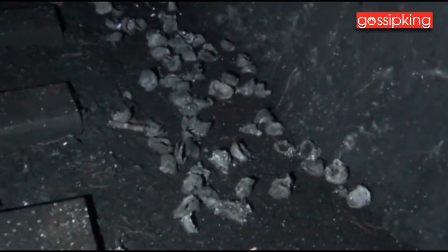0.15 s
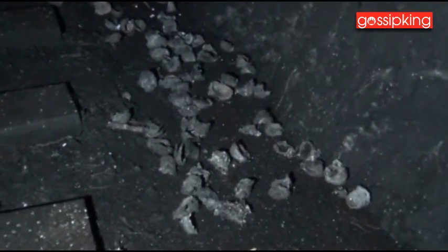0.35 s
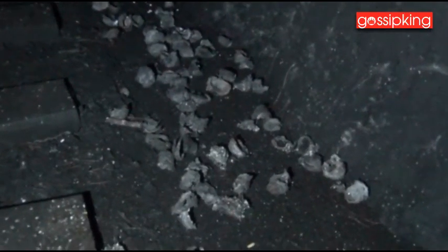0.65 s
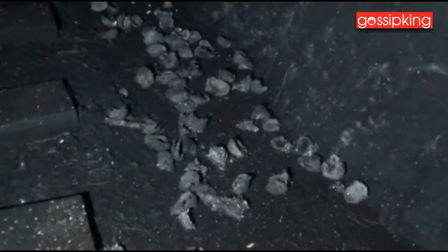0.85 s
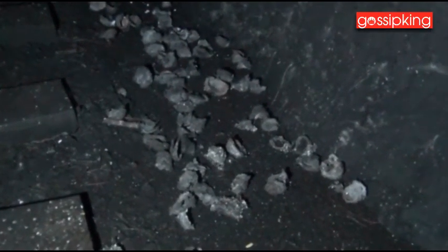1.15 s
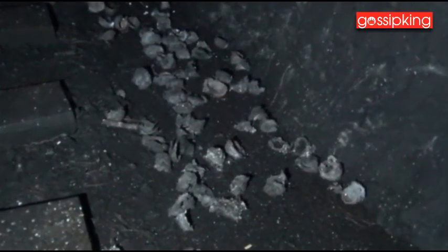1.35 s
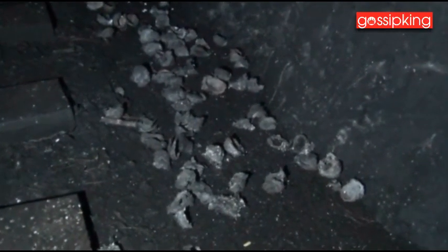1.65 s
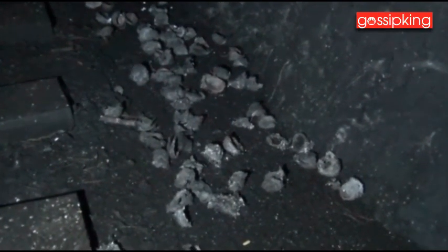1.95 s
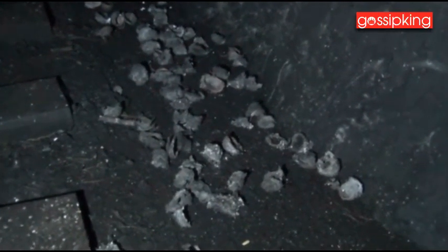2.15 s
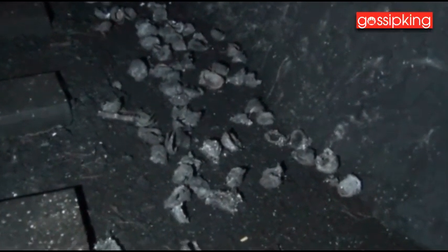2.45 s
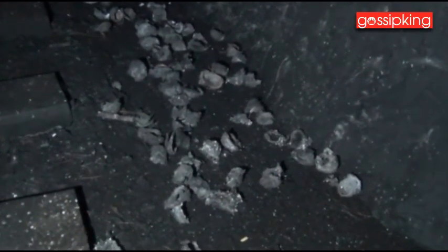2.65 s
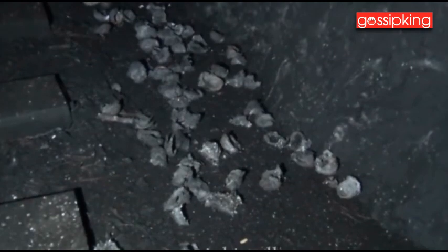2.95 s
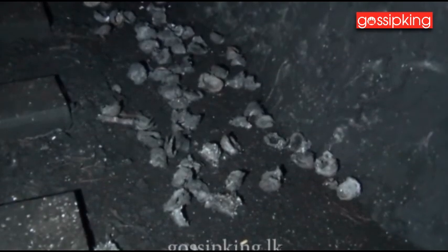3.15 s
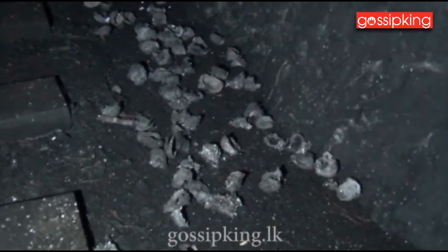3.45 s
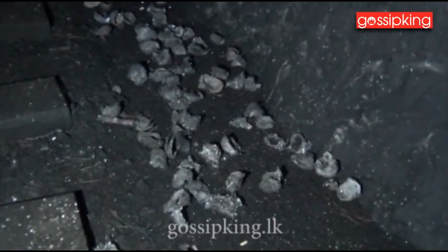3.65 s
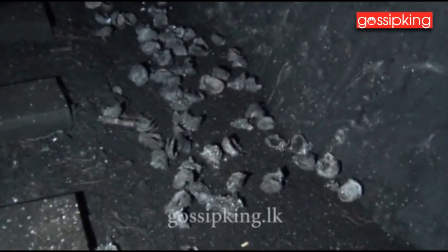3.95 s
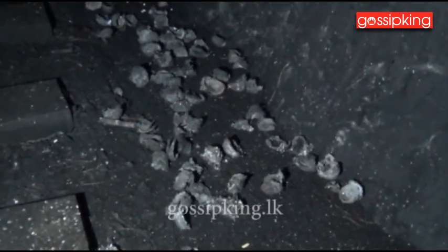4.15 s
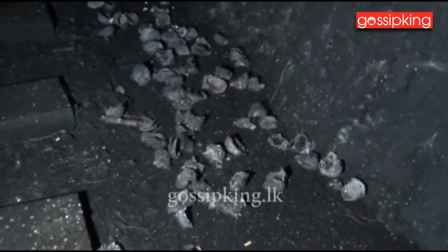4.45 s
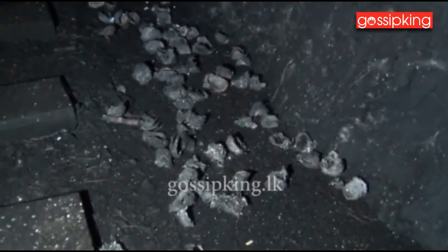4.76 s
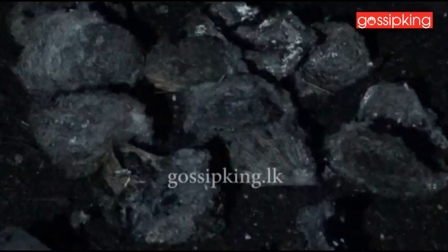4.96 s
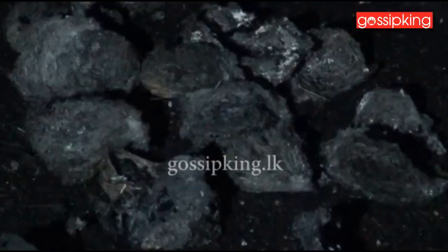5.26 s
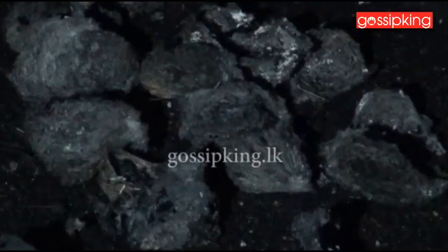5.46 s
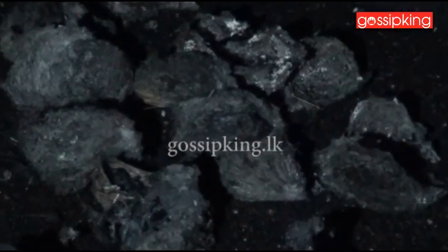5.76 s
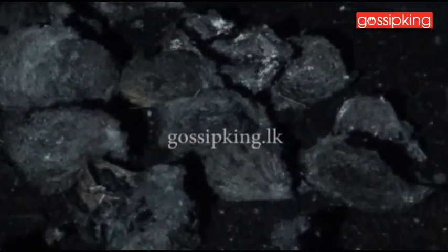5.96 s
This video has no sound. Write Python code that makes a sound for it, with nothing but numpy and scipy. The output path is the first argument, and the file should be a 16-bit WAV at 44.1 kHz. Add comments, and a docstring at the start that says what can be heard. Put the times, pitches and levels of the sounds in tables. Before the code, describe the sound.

A steady, high-pitched drone of many insects fills the night outdoors, over a faint low rush of air. Close by, dry litter crackles and rustles in small snaps, mostly during the first three seconds, with a few faint scrapes and soft bumps. Shells click and knock with a very short ring: lightly at about 0.7 seconds, sharply at 1.2, and in a cluster around 2.5. From about 2.2 seconds, one nearer insect rasps in rough, rising chirps, five a second, growing a little louder. Light clicks come around 4 seconds and a sharper knock at 4.7. Just before 5 seconds the level dips for an instant and the near rasp is gone. The drone continues, with thin, very high chirrs repeating until about 5.9. The loudest shell knock lands at 5.5 seconds, followed by a smaller one, and the level dips briefly again at 6.

```python
"""Outdoors at night, over a litter of shells on damp ground. Countless insect wing strokes merge into a
high drone above the low night air. One nearer insect draws a scraper along a file in rising chirps,
five a second. Close by, dry litter crackles and rustles, surfaces scrape, and struck shells ring.
The level dips briefly twice; after the first dip the near rasp is gone and thin, higher chirrs repeat."""
import sys
import numpy as np
from scipy import signal
from scipy.fft import rfft, irfft
from scipy.io import wavfile
from scipy.ndimage import uniform_filter1d

SR = 44100
rng = np.random.default_rng(int(sys.argv[2]) if len(sys.argv) > 2 else 0)


def store_pcm(level_fs):
    """Save levels as 16-bit WAV."""
    pcm = np.round(np.clip(level_fs, -1, 1) * 32767).astype(np.int16)
    wavfile.write(sys.argv[1], SR, np.atleast_2d(pcm).T)


N = 268789
TIME = np.arange(N) / SR
FREQS = np.maximum(np.fft.rfftfreq(N, 1 / SR), 1)

# Chorus spectra before and after the first dip. Each row: frequency in Hz, relative density in dB.
EARLY_SPECTRUM = [(900, -46), (1600, -7.5), (2000, -7.5), (2600, -2.5), (3700, 1.5), (5500, 2), (6700, 1.5),
                  (7600, -7.5), (9100, -12), (10000, -17), (11200, -23.5), (13000, -98)]
LATE_SPECTRUM = [(880, -49), (1500, -8), (1790, -2.5), (1950, -40), (2070, -10), (2380, -4.5), (2720, -0.5),
                 (3730, 3), (4820, 1), (6020, 5), (7970, -7.5), (10200, -11.5), (11500, -24), (15000, -50),
                 (22000, -120)]
# Base stereo width before and after that dip. Each row: frequency in Hz, side minus mid in dB.
EARLY_SIDE = [(1500, -24), (3000, -16.5), (4500, -19.5), (6000, -13), (8000, -11), (11000, -13)]
LATE_SIDE = [(1500, -12), (4500, -7.5), (8000, -4.5)]
# The chorus widens, then narrows somewhat. Each row: time in seconds, change of side level in dB.
WIDTH_CHANGE = [(0, -15), (1.5, 4.5), (3, 8.5), (4.9, -3.5)]
# Surges of the chorus. Each row: start in seconds, length in seconds, rise in dB.
CHORUS_SURGES = [(0.395, 0.13, 1), (0.956, 0.1, 2.5), (1.178, 0.097, 5), (1.397, 0.03, 4), (1.53, 0.12, 2),
                 (1.738, 0.056, 3.5), (1.88, 0.47, 1.2), (2.463, 0.02, 12), (2.508, 0.047, 6),
                 (2.738, 0.2, 2.5), (3.453, 0.041, 5.5), (3.765, 0.46, 1), (4.357, 0.53, 2.5),
                 (5.718, 0.032, 7)]
# Lulls of the chorus. Each row: start in seconds, length in seconds.
CHORUS_LULLS = [(0.353, 0.019), (1.086, 0.15), (1.688, 0.072), (1.81, 0.049), (5.05, 0.064)]
# Resonances of single wing strokes. Each entry: frequency in Hz.
WING_RESONANCES = [3320, 4200, 5250, 6200]
# Spectrum of the distant air. Each row: frequency in Hz, relative density in dB.
AIR_SPECTRUM = [(15, -39), (25, -5.5), (48, 4), (75, -1), (110, 4), (200, -0.5), (300, 1), (400, -3),
                (480, -4), (620, -5), (740, -2), (870, 1.5), (1080, -8.5), (1260, -1), (1550, -16.5),
                (2000, -8), (2600, -33), (4400, -90)]
# Snaps of dry litter. Each row: start in seconds, level in dB, centre in Hz, relative rustle in dB.
LITTER_SNAPS = [(.1586, -29, 8840, -26), (.508, -31, 7800, -13), (1.279, -22, 5900, -30),
                (1.4005, -22.5, 5470, -31), (1.4067, -29, 5300, -14.5), (1.543, -31, 4500, -15),
                (1.5495, -23.5, 4500, -21), (1.6137, -32, 4300, -13), (1.6197, -31, 4770, -22),
                (1.7479, -35, 4380, -14), (1.8836, -29.5, 4000, -9.5), (1.9734, -35, 4660, -18),
                (2.4825, -27, 3000, -29), (2.5925, -29, 3930, -25), (2.7726, -31, 4000, -18),
                (4.0053, -31, 4590, -17), (4.66, -28, 2800, -25), (4.9826, -36, 3340, -21)]
# Thin chirrs of single insects. Each row: start in seconds, centre in Hz.
HIGH_CHIRRS = [(0.23, 6480), (1.165, 6800), (5.135, 9900), (5.242, 10200), (5.334, 10500), (5.472, 10400),
               (5.611, 9450), (5.709, 9500), (5.837, 9400)]
# Scrapes and soft bumps. Each row: start in seconds, length in seconds, centre in Hz, level in dB.
RUBS = [(0.278, 0.03, 350, -43), (0.998, 0.082, 1130, -45.5), (1.917, 0.068, 268, -46),
        (2.443, 0.065, 1090, -44), (2.599, 0.029, 1150, -44), (3.91, 0.024, 930, -44.5),
        (4.662, 0.059, 870, -43.5), (4.785, 0.14, 47, -46), (4.851, 0.035, 606, -41),
        (5.486, 0.049, 970, -41), (5.655, 0.048, 300, -47.5), (6.012, 0.08, 267, -44.5)]
# Shifts of dry litter. Each row: start in seconds, length in seconds, centre in Hz, level in dB.
LITTER_SHIFTS = [(0.404, 0.031, 4300, -47), (0.464, 0.093, 3800, -49), (0.956, 0.05, 3720, -60),
                 (1.182, 0.1, 4200, -57), (1.404, 0.03, 3700, -45), (1.537, 0.056, 4000, -48),
                 (1.61, 0.042, 4730, -46), (1.745, 0.085, 3950, -48), (1.966, 0.045, 5000, -47)]
# Blows on shells. Each row: start in seconds, level in dB, ring in Hz, left minus right in dB,
# then the relative gains of thud, snap and overtone in dB.
BLOWS = [(0.6522, -30, 870, 4.5, -10.5, 2, -11), (0.975, -36, 1010, 4, -25, -26, -18),
         (1.009, -32, 1250, 0, -16, -23, -11), (1.031, -33, 1270, 0, -21, -20, -12),
         (1.048, -37, 1300, -2, -10, -14, -14), (1.1013, -27.5, 830, 1, -32, -1.5, -16),
         (1.137, -41, 1200, 1, -29, 0, -14), (1.2455, -15.5, 850, -3, -37, -11, -19),
         (1.279, -29.5, 1090, 2, -23, -4, -20), (2.3805, -33.5, 1130, 8, -31, -0.5, -9),
         (2.433, -38, 915, 1, -26, -8, -13), (2.474, -32, 950, -3, -26, -23, -20),
         (2.482, -21.5, 1160, 0, -35, -17, -14), (2.569, -16.5, 875, -2, -33, -28, -22),
         (2.5924, -23, 1250, 3, -37, -8, -17), (2.605, -33, 1010, 0, -28, -5, -5),
         (2.614, -32.5, 1100, 8, -32, -1, -9), (3.832, -32, 1060, 6, -32, -0.5, -21),
         (3.895, -36.5, 920, 2, -11, -19, -17), (4.0072, -34.5, 1070, 8, -4, 3.5, -13),
         (4.0182, -33.5, 900, 2, -3, -9, -7), (4.0984, -34, 960, 5, -32, 2, -8.5),
         (4.661, -26, 1340, 5.5, -25, -6, -15), (4.7151, -16.5, 993, 3.5, -16, -30, -7.5),
         (4.738, -31.5, 875, 10, -7.5, 5, -10), (4.861, -29.5, 950, -1, -12, -5, -12),
         (4.8639, -27.5, 960, 3, -11, -6, -10), (5.5469, -9, 1300, 4, -22, -13, -23),
         (5.5499, -19, 1110, 3, -25, -23, -18), (5.562, -39, 910, 1, -6, -6, -14),
         (5.573, -37, 895, 1, -7, -8, -12), (5.592, -39, 1900, 3, -25, 0, -20),
         (5.598, -36.5, 1800, 8, -25, 5.5, -20), (5.699, -34, 860, -3, -15, 5, -18),
         (5.7023, -23.5, 820, 6, -10, -5.5, -31)]
# Dull modes of the ground. Each row: frequency in Hz, decay time in seconds, gain in dB.
GROUND_MODES = [(144, 0.012, -19), (229, 0.0041, -0.5), (431, 0.0077, -1.5)]
# Modes of a struck shell. Each row: frequency in Hz, bandwidth in Hz, gain in dB.
SHELL_MODES = [(740, 100, -2.5), (1037, 50, 2.5), (1590, 15, 1.5), (2190, 100, -10), (2780, 130, 2)]
# Chirps of the near rasp. Each row: start in seconds, final pitch in Hz, base level in dB.
RASP_CHIRPS = [(2.19, 2200, -47.5), (2.384, 2263, -44), (2.6, 2297, -41.5), (2.785, 2246, -44.5),
               (2.966, 2297, -42), (3.16, 2262, -40.5), (3.354, 2520, -39), (3.55, 2302, -39),
               (3.755, 2570, -39.6), (3.942, 2290, -41), (4.13, 2357, -40), (4.325, 2710, -37),
               (4.519, 2600, -37), (4.725, 2408, -39), (4.88, 2310, -48)]
# Partials of the rasp. Each row: harmonic number, bandwidth in Hz for a chirp ending at 2450 Hz,
# gain in dB, relative reverberation in dB, growth in dB per dB of chirp level.
RASP_PARTIALS = [(1, 380, -13.8, -3, 1), (2, 740, -5.5, -3.5, 1), (3, 2600, -18, -7, 1.5),
                 (4, 4100, -22, -11, 1)]
# Reflections of the rasp from hard surfaces close by. Each row: delay in seconds, gain in dB.
REFLECTIONS = [(0.0036, -14), (0.0104, -5.5), (0.0294, -15.5)]
# Brief dips of the level. Each row: centre in seconds, half length in seconds.
LEVEL_DIPS = [(4.973, 0.0091), (6.009, 0.0046)]


def undb(db):
    """Amplitude grows tenfold for every 20 dB."""
    return 10 ** (np.asarray(db) / 20)


def unit(x):
    """Normalisation brings the rms amplitude to 1."""
    return x / np.sqrt(np.mean(x ** 2))


def walk(rate, size=N):
    """Random steps, rate a second, are smoothed twice into a continuous fluctuation of rms 1."""
    hold = max(int(SR / rate), 1)
    steps = np.repeat(rng.standard_normal(size // hold + 1), hold)
    return unit(uniform_filter1d(uniform_filter1d(steps, hold), hold)[:size])


def resonate(x, hz, width):
    """A damped resonator passes a band about its natural frequency, with gain 1 at the centre."""
    hz = min(hz, SR / 2 - 2000)
    return signal.lfilter(*signal.iirpeak(hz, hz / width, fs=SR), x)


def pan(pan_db):
    """A level difference, left minus right, sets the apparent direction."""
    return undb(np.array([[pan_db], [-pan_db]]) / 2)


def stereo_noise(size, side_db):
    """A side signal of opposite sign in each channel lowers the coherence of white noise."""
    mid, side = rng.standard_normal((2, size))
    return unit(mid + undb(side_db) * side * np.array([[1], [-1]]))


def colour(x, points):
    """Spectral weighting through (Hz, dB) points sets the timbre; the result has rms 1."""
    hz, db = np.transpose(points)
    gain = undb(np.interp(np.log(FREQS), np.log(hz), db))
    return unit(irfft(rfft(x) * gain, N))


def add(out, start, x):
    """Sounds superpose: x joins the mix at start seconds."""
    i = max(int(start * SR), 0)
    out[:, i:i + x.shape[-1]] += x[..., :max(N - i, 0)]


def swell(length):
    """A half sine gives a rounded rise and fall over length seconds."""
    return np.abs(np.sin(np.linspace(0, np.pi, int(length * SR))))


def chorus(spectrum, width, gain_db, flutter_db):
    """Countless wing strokes add incoherently into a fluttering band of noise, wider toward the top."""
    mid, side = rng.standard_normal((2, N))
    side = irfft(rfft(side) * undb(np.interp(FREQS, *np.transpose(width))), N)
    side *= undb(np.interp(TIME, *np.transpose(WIDTH_CHANGE)))
    flutter = undb(flutter_db * walk(70) + 0.77 * walk(900))
    strokes = (mid + side * np.array([[1], [-1]])) * flutter
    # groups of singers at different pitches swell and fade on their own
    for group_hz in np.geomspace(1700, 9500, num=6):
        strokes = strokes + resonate(strokes, group_hz, group_hz / 4) * (undb(1.12 * walk(20)) - 1)
    return colour(strokes, spectrum) * undb(gain_db)


def wing_ticks(per_second=98, spread_db=13, level_db=-56):
    """Single wing strokes act as random impulses, each exciting a broad resonance."""
    out = np.zeros((2, N))
    count = int(per_second * N / SR / len(WING_RESONANCES))
    for hz in WING_RESONANCES:
        when, softness, place = rng.random((count, 3)).T
        strokes = np.zeros((2, N))
        strokes[:, (when * N).astype(int)] = undb(-spread_db * softness) * np.sqrt([place, 1 - place])
        out += resonate(resonate(strokes, hz, hz / 3), hz, hz / 3)
    return unit(out) * undb(level_db)


def chorus_effort(attack_s=0.012, release_s=0.052, lull_db=-3, waver_db=0.28):
    """The singers' effort modulates the amplitude: quick surges, short lulls and a slight waver."""
    db = waver_db * walk(37)
    lulls = [(start, length, lull_db) for start, length in CHORUS_LULLS]
    for start, length, change_db in CHORUS_SURGES + lulls:
        attack = np.clip((TIME - start) / attack_s, 0, 1)
        release = np.clip((start + length - TIME) / release_s + 0.5, 0, 1)
        db = db + change_db * attack * release
    return undb(db)


def night_air(late, level_db=-53, late_rise_db=2.7):
    """Slowly modulated low-frequency noise forms a background, a little louder after the first dip."""
    air = colour(stereo_noise(N, -9) * undb(1.36 * walk(20)), AIR_SPECTRUM)
    return air * undb(level_db + late_rise_db * late) * pan(3.2)


def crackles(crack_s=0.00077, rustle_s=0.026):
    """Snapping litter excites a broad resonance with two decays: a fast crack and a slower rustle."""
    out = np.zeros((2, N))
    t = np.arange(SR // 8) / SR
    for start, db, hz, rustle_db in LITTER_SNAPS:
        fibres = resonate(resonate(stereo_noise(len(t), -17), hz, 0.47 * hz), hz, 0.71 * hz)
        crack = fibres * np.exp(-t / crack_s)
        rustle = unit(fibres) * np.exp(-t / 0.026) * undb(rustle_db)
        add(out, start, (crack / np.abs(crack).max() + rustle) * undb(db))
    return out * pan(2)


def thin_chirrs(reference_hz=9800, reference_s=0.067, reference_db=-53.5, db_per_octave=-15.5):
    """Single insects radiate narrow bands of very high noise; lower chirrs are longer and louder."""
    out = np.zeros((2, N))
    for start, hz in HIGH_CHIRRS:
        envelope = swell(reference_s * (reference_hz / hz) ** 1.4)
        buzz = resonate(resonate(stereo_noise(len(envelope), -9.5), hz, 1200), hz, 1200)
        db = reference_db + db_per_octave * np.log2(hz / reference_hz)
        add(out, start, unit(buzz) * envelope * undb(db))
    return out * pan(3)


def stick_slip(size, hz, slips_per_s=130, decay_cycles=0.3):
    """Stick-slip friction releases uneven bursts of noise into one broad resonance; rms 1."""
    phase = np.cumsum(slips_per_s * undb(3 * walk(120, size))) / SR % 1
    bursts = stereo_noise(size, -31) * np.exp(-phase / decay_cycles) * undb(1.34 * walk(340, size))
    return unit(resonate(resonate(bursts, hz, 0.87 * hz), hz, 1.55 * hz))


def scrapes():
    """Friction swells and fades in short rubs; those with a low resonance sound as soft bumps."""
    out = np.zeros((2, N))
    for start, length, hz, db in RUBS:
        envelope = swell(length)
        add(out, start, stick_slip(len(envelope), hz) * envelope * undb(db))
    return out * pan(2.8)


def rustles():
    """Friction in shifting litter drives a narrow, high resonance in brief, grainy patches."""
    out = np.zeros((2, N))
    for start, length, hz, db in LITTER_SHIFTS:
        envelope = swell(length)
        grains = resonate(stick_slip(len(envelope), hz), hz, 0.1 * hz)
        add(out, start, unit(grains) * envelope * undb(db))
    return out * pan(1.8)


def damped_cycles(age, turns):
    """A transient vibration builds to an amplitude of 1 at age 2, then damping removes it."""
    return (age / 2) ** 2 * np.exp(2 - age) * np.sin(2 * np.pi * turns)


def knocks(overtone_hz=1587, ring_db=-5.5, grit_db=-27, scatter_db=-33):
    """An impact excites the damped modes of shell and ground and stirs grit; the ground scatters it."""
    out = np.zeros((2, N))
    t = np.arange(SR // 10) / SR
    # small shells radiate low frequencies poorly
    radiation = signal.butter(3, 380, "highpass", fs=SR, output="sos")
    for start, db, hz, pan_db, thud_db, snap_db, overtone_db in BLOWS:
        # softer blows snap less and last longer
        decay_cycles = 0.35 * 2 ** (-snap_db / 34.5)
        blow = damped_cycles(t * hz / decay_cycles, hz * t)
        blow += undb(overtone_db) * damped_cycles(t / 0.001, overtone_hz * t)
        snap = resonate(stereo_noise(len(t), -38), 1900, 800) * np.exp(-t / 0.0043) * 2
        thud = sum(np.sin(2 * np.pi * mode_hz * t) * np.exp(-t / decay) * undb(mode_db)
                   for mode_hz, decay, mode_db in GROUND_MODES)
        contact = signal.sosfilt(radiation, blow + undb(snap_db) * snap) + undb(thud_db) * thud
        ring = sum(undb(mode_db) * resonate(contact, mode_hz, width)
                   for mode_hz, width, mode_db in SHELL_MODES)
        grit = stick_slip(len(t), 1230) * np.exp(-t / 0.032)
        # strong returns from things close by, then a faint tail
        returns = np.exp(-t / 0.006) + undb(-4.5) * np.exp(-t / 0.021)
        scatter = stereo_noise(len(t), 0) * returns * (1 - np.exp(-t / 0.0016))
        tail = signal.fftconvolve(contact, scatter, axes=1)[:, :len(t)]
        knock = contact + undb(ring_db) * ring + undb(grit_db) * grit + undb(scatter_db) * tail
        add(out, start, knock * undb(db) * pan(pan_db))
    return out


def wobble(size, width):
    """Random modulation of amplitude and phase spreads a tone over a band, width Hz across."""
    drift = stereo_noise(size, -16.5) + 1j * stereo_noise(size, -15)
    return signal.sosfilt(signal.butter(3, width / 2, fs=SR, output="sos"), drift) * np.sqrt(SR / width)


def file_stroke(harmonic, width, to_hz, from_hz=2090):
    """Pitch follows the rate of tooth strikes: a partial rises and levels off with the scraper's speed."""
    # a faster stroke reaches the end of the file sooner: 0.2 s for one ending at 2285 Hz
    size = int(0.2 * 2285 / to_hz * SR)
    progress = np.linspace(0, 1, size)
    envelope = np.abs(np.sin(np.pi * progress ** 0.55)) ** 0.66  # strongest before the middle
    pitch = to_hz + (from_hz - to_hz) * (1 - progress) ** 3.3
    phase = 2 * np.pi * np.cumsum(pitch) / SR
    # faster strokes strike the teeth less evenly, so their partials are broader
    bandwidth = width * (to_hz / 2450) ** 2
    skirt = wobble(size, bandwidth)
    core = 0.58 * wobble(size, bandwidth / 5)
    return unit(np.real((skirt + core) * np.exp(1j * harmonic * phase))) * envelope


def near_rasp(linger_s=0.12, typical_db=-39):
    """Stridulation: a scraper crosses a file in rough harmonic chirps that reverberate and reflect."""
    t = np.arange(SR // 4) / SR
    surroundings = stereo_noise(len(t), -32) * np.exp(-t / linger_s) / np.sqrt(linger_s * SR / 2)
    teeth = undb(2.8 * walk(300) + 1.4 * walk(45))
    rasp = np.zeros((2, N))
    for harmonic, width, partial_db, linger_db, growth in RASP_PARTIALS:
        partial = np.zeros((2, N))
        for start, to_hz, db in RASP_CHIRPS:
            level_db = typical_db + growth * (db - typical_db) + partial_db
            add(partial, start, file_stroke(harmonic, width, to_hz) * undb(level_db))
        reverberation = signal.oaconvolve(partial, surroundings, axes=1)[:, :N]
        rasp += partial * teeth + undb(linger_db) * reverberation
    # delayed copies interfere and comb the spectrum into fine strands
    heard = rasp.copy()
    for delay, db in REFLECTIONS:
        add(heard, delay, rasp * undb(db))
    return heard * pan(1.8)


def scene():
    """Insects, small near sounds and air superpose; the chorus changes timbre at the first dip."""
    late = TIME > LEVEL_DIPS[0][0]
    early_drone = chorus(EARLY_SPECTRUM, EARLY_SIDE, gain_db=-44.5, flutter_db=1.56)
    late_drone = chorus(LATE_SPECTRUM, LATE_SIDE, gain_db=-43.5, flutter_db=1.2)
    drone = np.where(late, late_drone * pan(3), (early_drone + wing_ticks()) * pan(2))
    insects = drone * chorus_effort() + near_rasp() * ~late + thin_chirrs()
    return insects + knocks() + crackles() + rustles() + scrapes() + night_air(late)


def record(dry, top_hz=11200):
    """The level dips briefly twice, and a steep low-pass filter limits the bandwidth."""
    for centre, half_length in LEVEL_DIPS:
        dry = dry * np.minimum(np.abs(TIME - centre) / half_length, 1) ** 2
    return signal.sosfilt(signal.ellip(10, 0.2, 80, top_hz, fs=SR, output="sos"), dry)


dry = scene()
out = record(dry)
store_pcm(out)
```